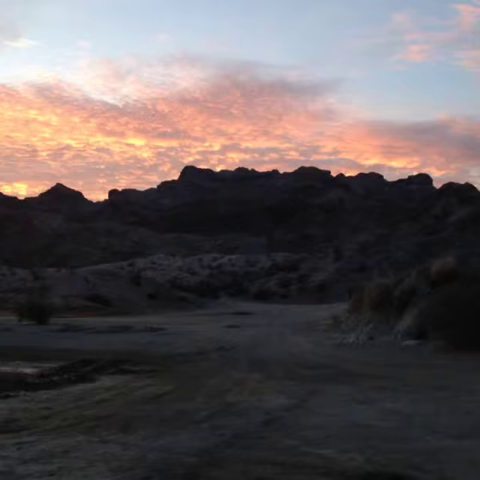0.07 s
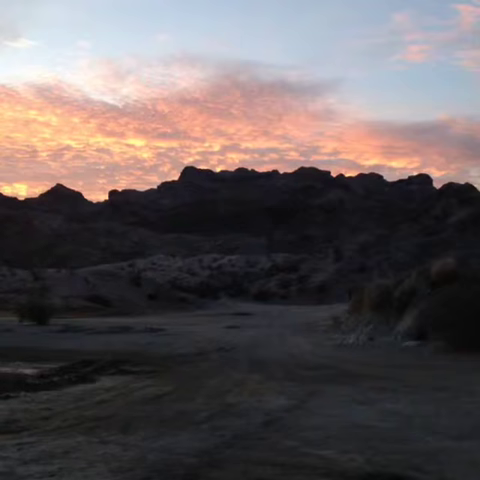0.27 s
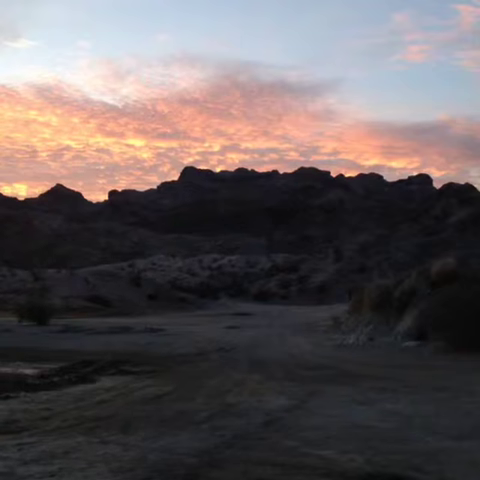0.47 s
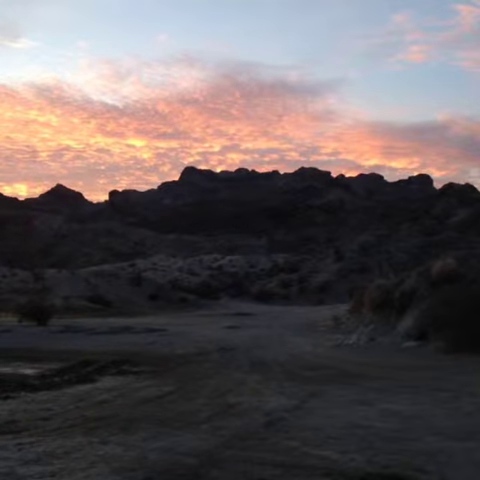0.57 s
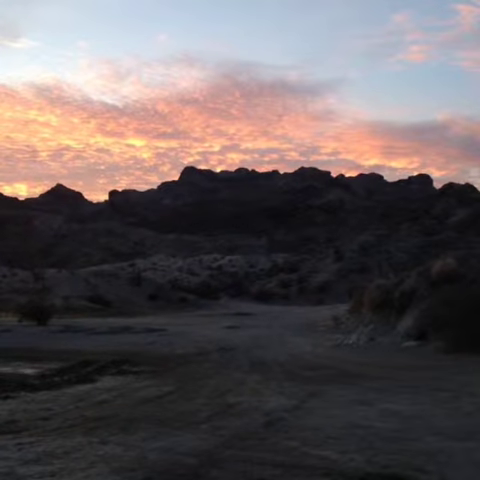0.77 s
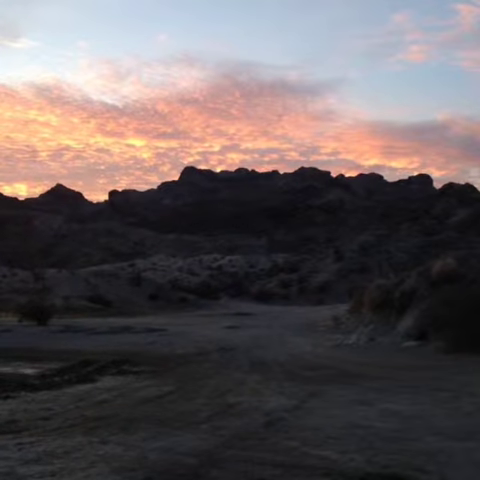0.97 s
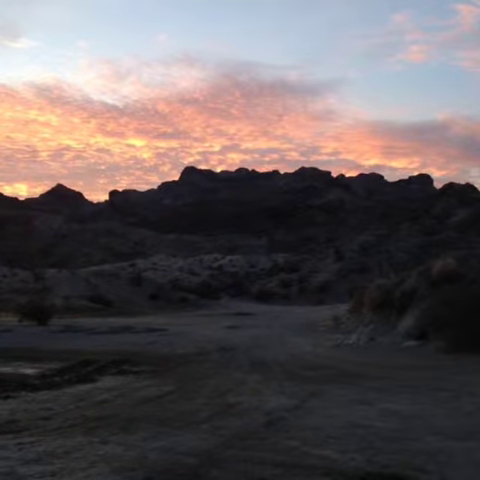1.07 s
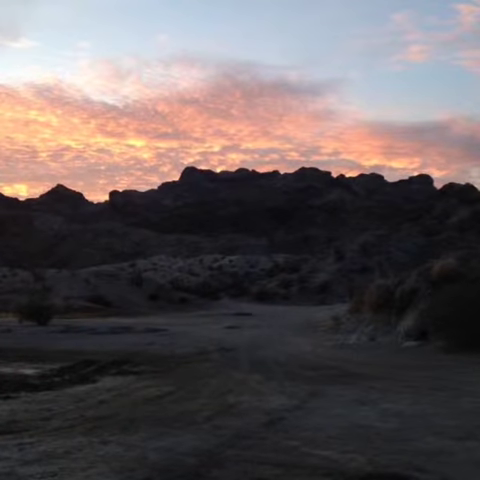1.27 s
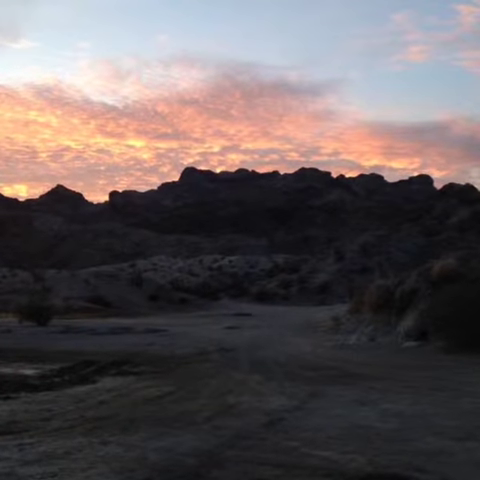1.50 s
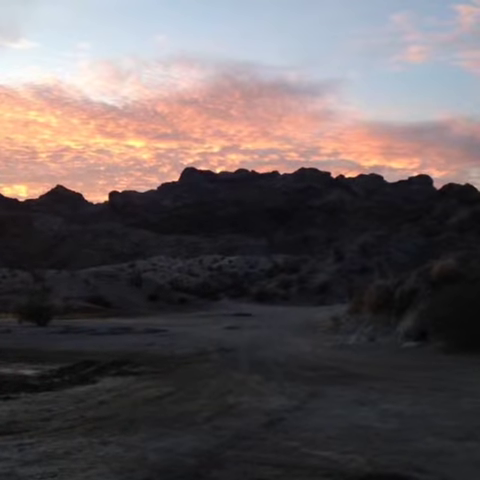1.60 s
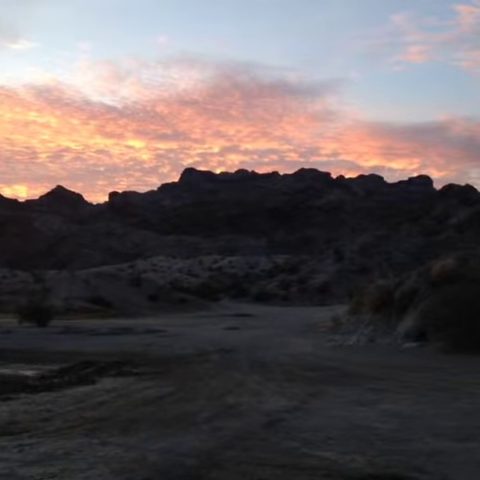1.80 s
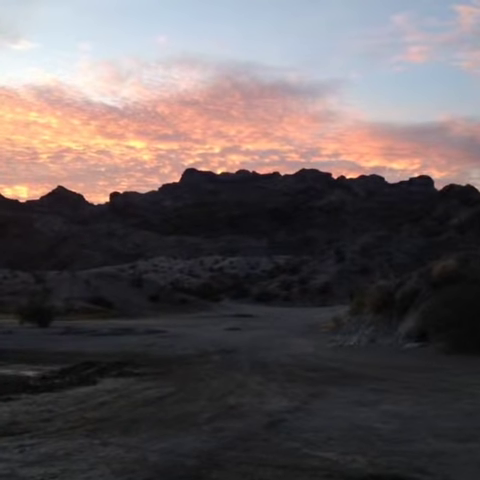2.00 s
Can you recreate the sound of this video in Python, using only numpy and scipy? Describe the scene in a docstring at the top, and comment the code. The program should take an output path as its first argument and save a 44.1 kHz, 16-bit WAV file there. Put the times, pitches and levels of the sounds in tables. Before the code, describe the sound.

Two coyote yaps rise into a warbling howl, followed by a short bark outdoors.

```python
"""A short yap sounds over a low distant rumble: a coyote in open desert at dusk. It yaps again and
breaks upward into a warbling howl; a gruff bark follows. Its vocal folds vibrate in alternating strong
and weak cycles for the yaps, almost sinusoidally for the howl, and unevenly for the bark. Rocky slopes
scatter the calls back. A small bird whistles two falling chirps; faint ticks and a rustle lie beneath."""
import sys
import numpy as np
from scipy import signal
from scipy.fft import rfft, irfft
from scipy.io import wavfile
from scipy.ndimage import uniform_filter1d

SR = 44100
rng = np.random.default_rng(int(sys.argv[2]) if len(sys.argv) > 2 else 0)


def unload_audio(sound):
    """Save the sound as a 16-bit wav file, at the path given as the first command line argument."""
    columns = np.transpose(np.atleast_2d(sound))
    # keep every value between -1 and 1, then stretch to whole-number steps
    steps = np.round(np.clip(columns, -1, 1) * 32767)
    wavfile.write(sys.argv[1], SR, steps.astype(np.int16))


N = 90404
TIME = np.arange(N) / SR

# Spectra of the hiss, the three bands of the rumble and the rustle: (frequency [Hz], relative level [dB])
HISS_SPECTRUM = [(100, -18), (500, 7), (800, -3.5), (1500, -6.5), (2500, -9), (4000, -9), (8000, -13.5),
                 (15000, -15)]
BASS_SPECTRUM = [(20, -29.5), (40, -19.5), (65, -7.5), (90, -1), (125, 5), (185, 1), (215, -12.5),
                 (300, -23), (500, -70.5)]
DRONE_SPECTRUM = [(150, -43), (210, -14.5), (245, -2), (282, 0.5), (315, -10), (345, -32), (400, -27),
                  (480, -33), (600, -45), (1000, -79)]
HUM_SPECTRUM = [(250, -11.5), (340, -11), (390, 1), (440, -8.5), (490, -15.5), (600, -26.5), (1000, -34.5),
                (2000, -67.5)]
RUSTLE_SPECTRUM = [(700, 0), (1800, 1.5), (3000, -1), (7000, -7.5), (12000, -10.5), (15000, -10)]
# Envelopes of the two swelling bands and the rustle: (time [s], level [dB])
BASS_ENVELOPE = [(0.1, -64), (0.11, -58), (0.364, -52.5), (0.898, -59), (0.964, -50.5), (1.104, -56),
                 (1.126, -46.5), (1.606, -58.5), (1.634, -50), (1.72, -58), (2.022, -52.5), (2.04, -61)]
DRONE_ENVELOPE = [(.1, -62), (.2, -58.5), (.3, -52), (.375, -41.5), (.46, -47), (.54, -52.5), (.9, -57),
                  (1.03, -55.5), (1.14, -48.5), (1.24, -55.5), (1.82, -54.5), (1.93, -56), (2.0, -41.5),
                  (2.04, -54.5)]
RUSTLE_ENVELOPE = [(1.55, -90), (1.66, -72.5), (1.74, -77), (1.79, -70.5), (1.84, -76), (1.89, -80),
                   (1.94, -87)]
# Dry contacts: (time [s], knock level [dB], snap level [dB])
TICKS = [(.148, -62.5, -57), (.181, -67.5, -60), (1.808, -53.5, -74), (1.888, -55, -77)]
# Spectra of their two parts: (frequency [Hz], relative level [dB])
KNOCK_SPECTRUM = [(600, -24), (1300, -7.5), (1900, 11.5), (2600, -16), (3200, 5), (4200, -16), (9000, -29)]
SNAP_SPECTRUM = [(1000, -5), (5000, -6.5), (15000, -16)]
# The bird's chirps: (onset [s], level [dB])
CHIRPS = [(0.793, -55), (1.64, -58)]
# Contour of one chirp: (time from onset [s], pitch [Hz], relative level [dB])
CHIRP_CONTOUR = [(0, 5100, -3), (.006, 5420, -10), (.013, 5510, 2), (.021, 5400, 1), (.031, 4900, -3),
                 (0.043, 4450, -8.5), (0.053, 4216, -14), (0.058, 3820, 0)]
# Reflections off nearby ground and rock: (delay [s], gain [dB])
ECHOES = [(.0046, -23), (.0165, -30), (.021, -22.5), (.0375, -15)]
# Frequency responses of the early reflections and the late tail: (frequency [Hz], gain [dB])
EARLY_RESPONSE = [(500, -14.5), (900, -4), (1500, 5), (2200, -4.5), (3000, 10.5), (4000, -7), (5500, 2)]
TAIL_RESPONSE = [(500, -6), (850, -10), (1050, 0), (1500, 3.5), (2000, -3), (3000, 11.5), (4000, -2)]
# The yaps: (time [s], pitch [Hz], fundamental level [dB], overtone gain [dB], half-pitch rasp gain [dB])
FIRST_YAP = [(.083, 527.6, -55, 3, -21), (.096, 611, -44, -2.5, 1.5), (.11, 706, -31.5, -14, 11.5),
             (.125, 776, -26, -10, 3), (.147, 871, -34, 3.5, -1.5), (.16, 859, -33, -5, 5.5),
             (.172, 763, -46, 0.5, -10.5), (.186, 652, -50, -3.5, 8)]
RISING_YAP = [(.275, 612, -56, 6, -14), (.285, 673.5, -49.5, 6, -15), (.295, 744, -33.5, -15.5, 15.5),
              (.311, 813.5, -30, -7.5, 1.5), (.321, 932, -43, 8, -2.5), (.336, 993, -47.5, 2.5, 6),
              (.368, 1050, -41.5, 6, -20), (.392, 1058, -47.5, -10, 5), (.408, 1083, -73, -3, -8)]
# Throat responses that weight their overtones: (frequency [Hz], gain [dB])
FIRST_THROAT = [(400, -53), (950, -12.5), (1290, -8), (1500, -18), (1720, -14), (2120, -8), (2350, -25.5),
                (2600, -23), (3000, -40), (3300, -48.5), (5000, -65)]
RISING_THROAT = [(400, -25.5), (1000, -30), (1400, -3.5), (1700, -24), (2000, -10.5), (2400, -12),
                 (2600, -27), (2770, -14), (2900, -22.5), (3120, -31.5), (3300, -47), (5000, -75)]
# The bark: (time [s], pitch [Hz], level [dB], gain of the formants above the first [dB])
BARK_CONTOUR = [(1.562, 261.5, -72, -8), (1.579, 290.7, -53.5, -9), (1.594, 311.8, -44.5, 2),
                (1.608, 404.2, -45, 15), (1.623, 371.3, -39, -2.5), (1.634, 315, -54, 0),
                (1.65, 280, -64, -5)]
# Its throat resonances: (frequency [Hz], bandwidth of one stage [Hz], gain [dB])
BARK_FORMANTS = [(600, 140, -12), (710, 310, 0.5), (930, 90, -16), (1240, 73, -4.5), (1730, 146, -1.5),
                 (2380, 110, -16)]
# The howl: (time [s], pitch [Hz], fundamental level [dB], relative octave level [dB])
HOWL_CONTOUR = [(.392, 1177, -57, -16), (.408, 1312, -47.5, -6), (.438, 1406, -45, -11),
                (.49, 1571, -43.5, -23), (.527, 1377, -53, -8.5), (.565, 1454, -49, -18),
                (.605, 1569, -42, -21), (.632, 1608, -50.5, -10), (.672, 1393, -54, -12),
                (.71, 1463, -46.5, -20.5), (.757, 1625, -48.5, -16.5), (.812, 1432, -52.5, -15),
                (.89, 1591, -46, -18.5), (.942, 1433, -55, -13.5), (1.025, 1569, -44.5, -23),
                (1.058, 1446, -59, -10), (1.09, 1480, -54, -20.5), (1.14, 1592, -42, -19.5),
                (1.17, 1413, -62.5, -6), (1.195, 900, -74, -12), (1.22, 800, -64.5, -30)]

FOLD_FLUTTER_HZ = 152   # bandwidth of the cycle-to-cycle irregularity in yaps and bark


def from_db(db):
    """Amplitude grows tenfold with every 20 dB."""
    return 10 ** (np.asarray(db) / 20)


def unit_rms(x):
    """Normalisation to unit mean power."""
    return x / np.sqrt(np.mean(x ** 2) + 1e-20)


def in_time(rows):
    """Linear interpolation of each column of a contour at every sample."""
    times, *columns = np.transpose(rows)
    return [np.interp(TIME, times, column) for column in columns]


def gate(rows, edge_s=.003):
    """A trapezoidal window, open while a contour lasts."""
    return np.clip(np.minimum(TIME - rows[0][0], rows[-1][0] - TIME) / edge_s, 0, 1)


def db_at(spectrum, hz):
    """Interpolation of a spectrum on a logarithmic frequency axis."""
    frequencies, db = np.transpose(spectrum)
    return np.interp(np.log(hz + 1e-9), np.log(frequencies), db)


def coloured(x, response):
    """Filtering as multiplication in the frequency domain."""
    hz = np.fft.rfftfreq(len(x), 1 / SR)
    return irfft(rfft(x) * from_db(db_at(response, hz)), len(x))


def noise(spectrum):
    """Spectrally shaped white noise of unit rms."""
    return unit_rms(coloured(rng.standard_normal(N), spectrum))


def drift(rate_hz):
    """A random modulator: low-pass noise of unit rms."""
    rolloff = 1 + (np.fft.rfftfreq(N, 1 / SR) / rate_hz) ** 4
    return unit_rms(irfft(rfft(rng.standard_normal(N)) / rolloff, N))


def phase_of(hz, jitter, rate_hz):
    """Phase is the integral of frequency, which here wavers by the fraction `jitter`."""
    return 2 * np.pi * np.cumsum(hz * (1 + jitter * drift(rate_hz))) / SR


def resonate(x, hz, width_hz):
    """A damped two-pole resonator with unit peak gain."""
    radius = np.exp(-np.pi * width_hz / SR)
    feedback = [1, -2 * radius * np.cos(2 * np.pi * hz / SR), radius ** 2]
    return signal.lfilter(np.array([1, 0, -1]) * (1 - radius ** 2) / 2, feedback, x)


def delayed(x, delay_s):
    """Propagation delay: a longer path brings the same wave later."""
    return np.interp(TIME - delay_s, TIME, x, left=0)


def scattered(x, delay_s, spread_s):
    """Diffuse scattering: brush and stones return a cluster of small reflections."""
    response = unit_rms(rng.standard_normal(N) * np.exp(-((TIME - delay_s) / spread_s) ** 2 / 2))
    return signal.fftconvolve(x, response / np.sqrt(N))[:N]


def background(hiss_db=-71, hum_db=-64):
    """Superposed noise bands: a distant bass and drone swell under a steady hum and thin hiss."""
    out = from_db(hiss_db) * noise(HISS_SPECTRUM) + from_db(hum_db) * noise(HUM_SPECTRUM)
    for envelope, spectrum in ((BASS_ENVELOPE, BASS_SPECTRUM), (DRONE_ENVELOPE, DRONE_SPECTRUM)):
        rumble = noise(spectrum)
        running_rms = np.sqrt(uniform_filter1d(rumble ** 2, size=5000))
        out = out + from_db(in_time(envelope)[0]) * rumble / running_rms
    return out


def rustle(grain_db=4):
    """Something dry shifts softly: random amplitude modulation makes the noise grainy."""
    level_db = in_time(RUSTLE_ENVELOPE)[0] + grain_db * drift(rate_hz=160)
    return gate(RUSTLE_ENVELOPE) * from_db(level_db) * noise(RUSTLE_SPECTRUM)


def ticks(decay_s=.0019):
    """Impact transients: each tiny dry contact is a noise burst that decays exponentially."""
    knock, snap = noise(KNOCK_SPECTRUM), noise(SNAP_SPECTRUM)
    out = 0
    for onset, knock_db, snap_db in TICKS:
        decay = (TIME > onset) * np.exp(-abs(TIME - onset) / decay_s)
        out = out + decay * (from_db(knock_db) * knock + from_db(snap_db) * snap)
    return out


def bird(octave_db=-28):
    """Frequency modulation: each chirp is a nearly pure whistle that arches and slides down."""
    out = 0
    for onset, db in CHIRPS:
        contour = [(onset + s, hz, db + shape_db) for s, hz, shape_db in CHIRP_CONTOUR]
        hz, level_db = in_time(contour)
        phase = phase_of(hz, jitter=.0047, rate_hz=98)
        whistle = np.sin(phase) + from_db(octave_db) * np.sin(2 * phase)
        out = out + np.sqrt(2) * gate(contour) * from_db(level_db) * whistle
    return out


def bird_reflections(x, cluster_db=-7.5, echo_db=-13):
    """Diffuse and specular reflection: a brief cluster and one delayed copy."""
    cluster = from_db(cluster_db) * scattered(x, delay_s=.0092, spread_s=.011)
    return cluster + from_db(echo_db) * delayed(x, delay_s=.026)


def desert_reflections(x, cluster_db=-7, cluster_s=.017, tail_db=-24, t60_s=1.83):
    """Multipath propagation: distinct reflections, a diffuse cluster and a decaying tail off the hills."""
    specular = sum(from_db(db) * delayed(x, s) for s, db in ECHOES)
    cluster = from_db(cluster_db) * scattered(x, cluster_s, spread_s=.016)
    decay = (TIME > cluster_s) * from_db(-60 * TIME / t60_s)
    response = unit_rms(rng.standard_normal(N) * decay)
    tail = from_db(tail_db) * signal.fftconvolve(x, response / np.sqrt(N))[:N]
    return coloured(specular + cluster, EARLY_RESPONSE) + coloured(tail, TAIL_RESPONSE)


def yap(contour, throat, turbulence_db, shimmer_db=1.5):
    """Period doubling: strong and weak fold cycles alternate, adding lines between the harmonics."""
    hz, level_db, overtone_db, rasp_db = in_time(contour)
    phase = phase_of(hz, jitter=.0046, rate_hz=FOLD_FLUTTER_HZ)
    throat_peak_db = max(db for _, db in throat)
    breath = from_db(turbulence_db + throat_peak_db) * noise(throat) * (1 + np.cos(phase / 2))
    partials = 0
    for k in (1, *range(3, 10)):   # multiples of half the pitch; k = 2 is the fundamental, added below
        partial_db = db_at(throat, hz * k / 2) + rasp_db * (k % 2) + shimmer_db * drift(FOLD_FLUTTER_HZ)
        partials = partials + from_db(partial_db) * np.sin(k * phase / 2 + rng.uniform(0, 2 * np.pi))
    voice = np.sin(phase) + from_db(overtone_db) * (partials + breath)
    return np.sqrt(2) * gate(contour) * from_db(level_db) * voice


def bark(turbulence=.86, top_hz=2800):
    """Source and filter: uneven glottal pulses and puffs of turbulence excite the throat's formants."""
    hz, level_db, treble_db = in_time(BARK_CONTOUR)
    phase = phase_of(hz, jitter=.068, rate_hz=FOLD_FLUTTER_HZ)
    pulses = unit_rms(np.diff(phase // (2 * np.pi), prepend=0))   # one impulse a cycle
    source = pulses + turbulence * rng.standard_normal(N) * (1 + np.cos(phase))
    voice = 0
    for k, (formant_hz, width_hz, db) in enumerate(BARK_FORMANTS):
        formant = resonate(resonate(source, formant_hz, width_hz), formant_hz, width_hz)
        voice = voice + from_db(db + treble_db * (k > 0)) * formant
    voice = signal.sosfilt(signal.butter(4, top_hz, fs=SR, output="sos"), voice)
    running_rms = np.sqrt(uniform_filter1d(voice ** 2, size=600) + 1e-9)
    return gate(BARK_CONTOUR) * from_db(level_db) * voice / running_rms


def howl(glide_s=.02, waver_hz=34, shimmer_db=1.3, octave_shimmer_db=2):
    """Falsetto phonation: a nearly pure tone with an unsteady octave warbles, then drops."""
    hz, level_db, octave_db = in_time(HOWL_CONTOUR)
    gliding_hz = uniform_filter1d(hz, int(glide_s * SR))
    phase = phase_of(gliding_hz, jitter=.0031, rate_hz=waver_hz)
    envelope = gate(HOWL_CONTOUR) * from_db(level_db - shimmer_db * drift(waver_hz))
    octave_gain = from_db(octave_db + octave_shimmer_db * drift(waver_hz))
    return np.sqrt(2) * envelope * (np.sin(phase) + octave_gain * np.sin(2 * phase))


def scene(bark_send_db=-5.5):
    """Superposition: the direct and reflected calls of coyote and bird add to the background."""
    yaps = yap(FIRST_YAP, FIRST_THROAT, turbulence_db=-19)
    yaps += yap(RISING_YAP, RISING_THROAT, turbulence_db=-20)
    wail, gruff, chirps = howl(), bark(), bird()
    reflected = desert_reflections(yaps + wail + from_db(bark_send_db) * gruff) + bird_reflections(chirps)
    return (yaps + wail + gruff + chirps + reflected + ticks() + rustle() + background())[None]


def record(dry, start_s=.0826, fade_s=.004, cutoff_hz=15400):
    """Gating and band limiting: the sound opens after a moment of silence, and its top is cut."""
    opening = np.clip((TIME - start_s) / fade_s, 0, 1)
    return signal.sosfilt(signal.ellip(10, .1, 70, cutoff_hz, fs=SR, output="sos"), dry * opening)


dry = scene()
out = record(dry)
unload_audio(out)
```